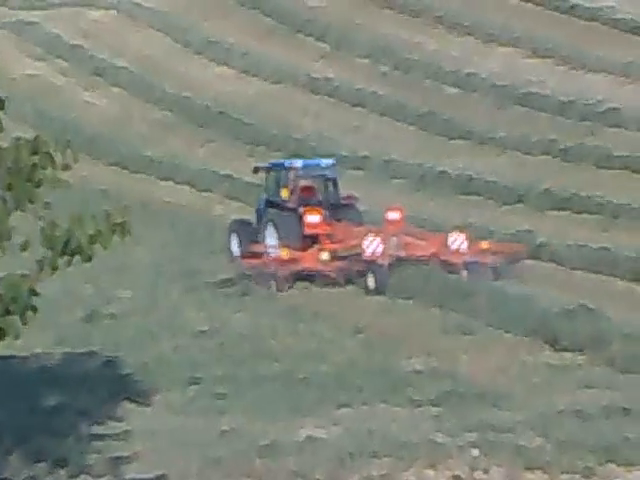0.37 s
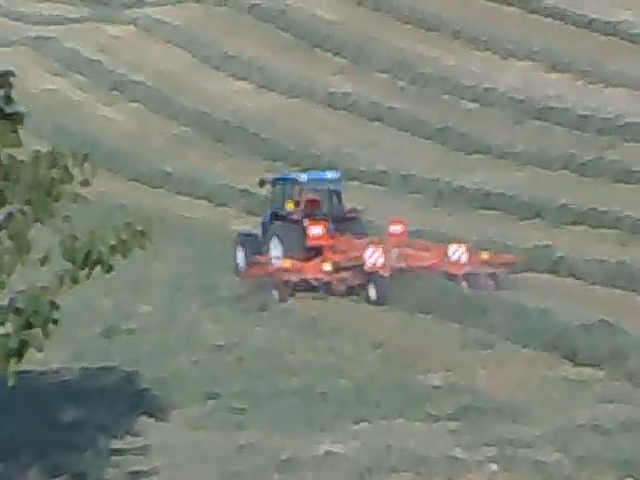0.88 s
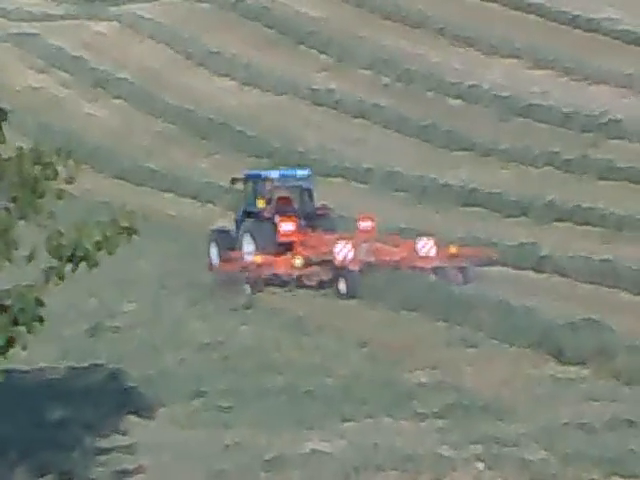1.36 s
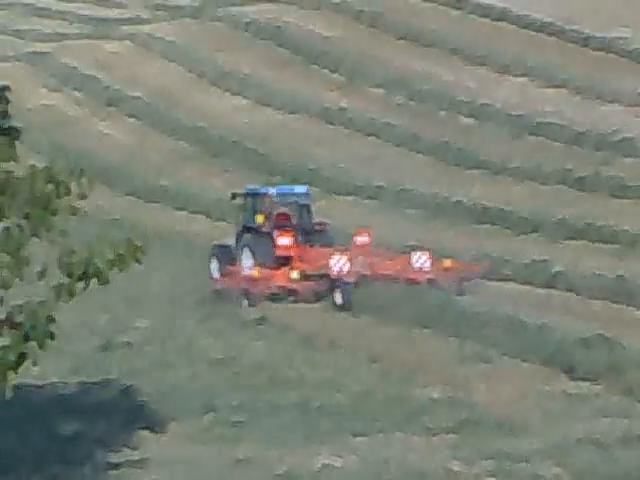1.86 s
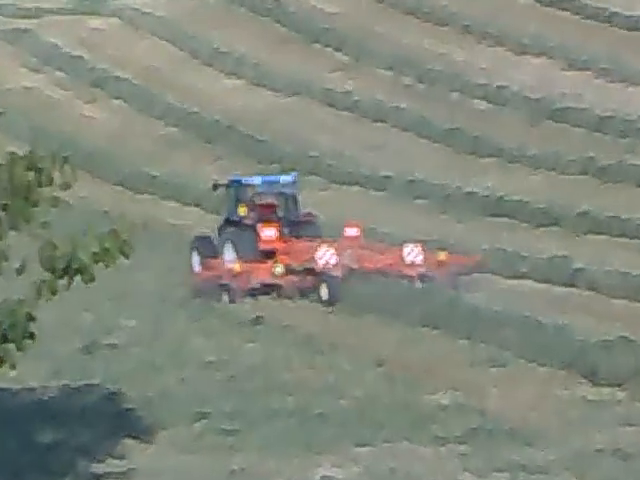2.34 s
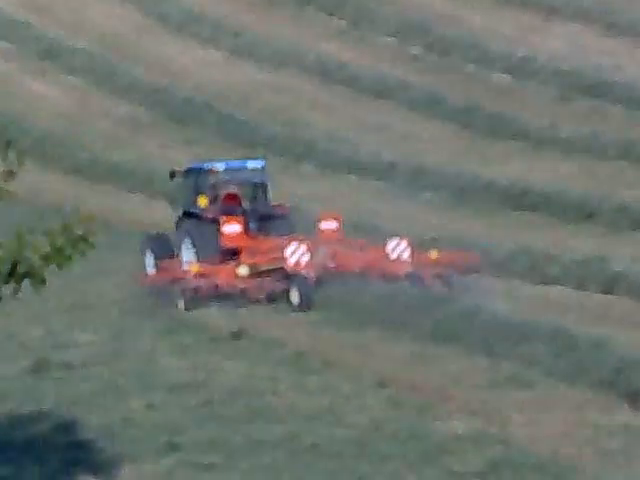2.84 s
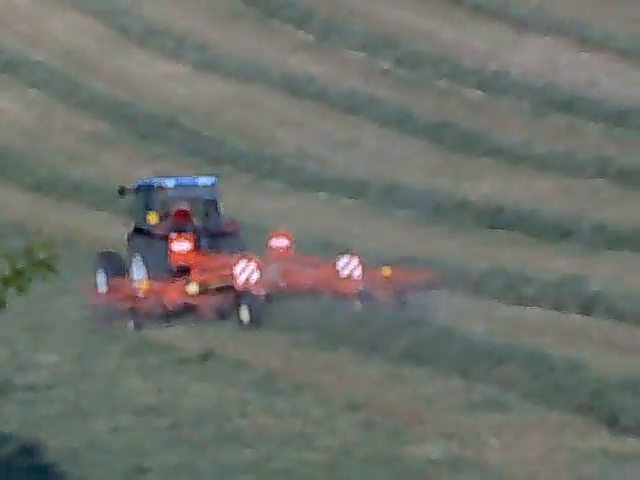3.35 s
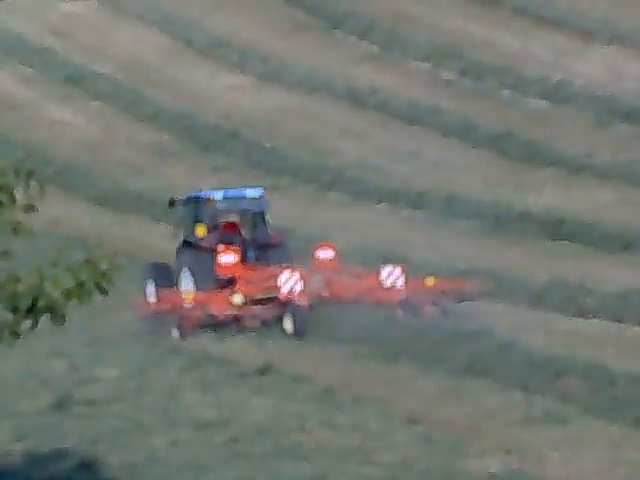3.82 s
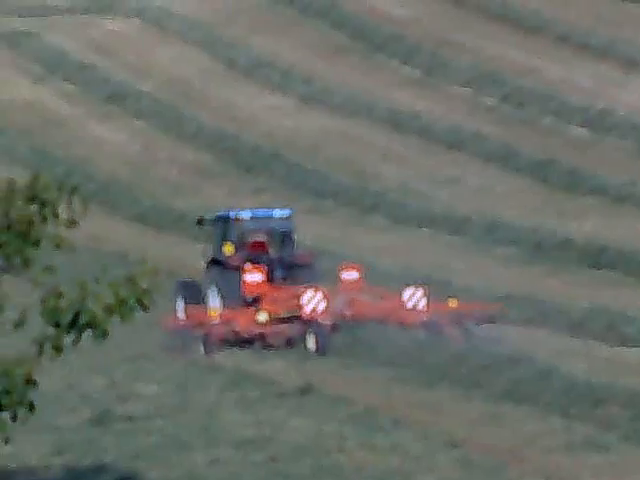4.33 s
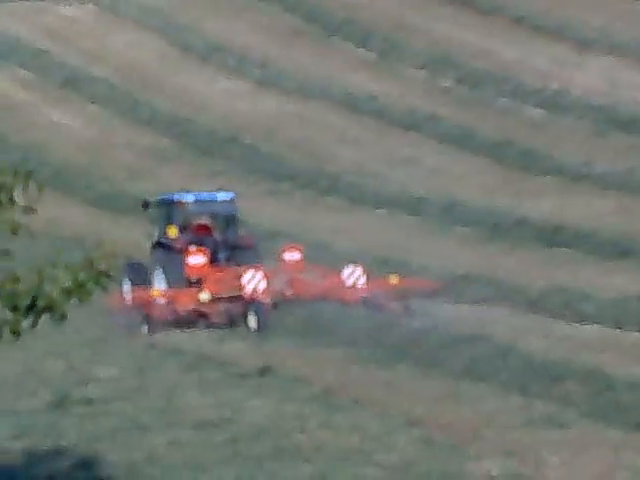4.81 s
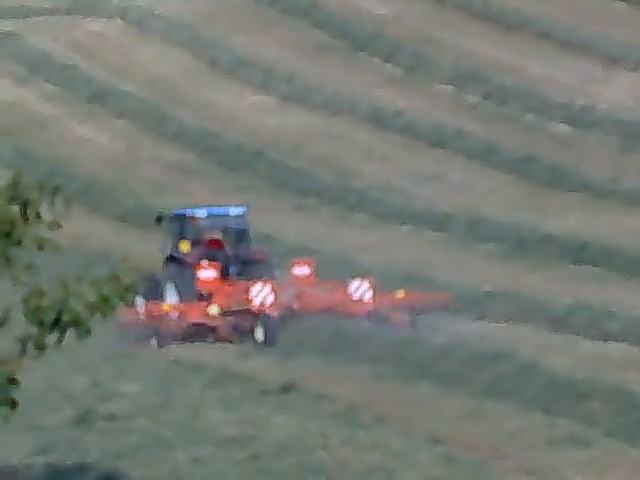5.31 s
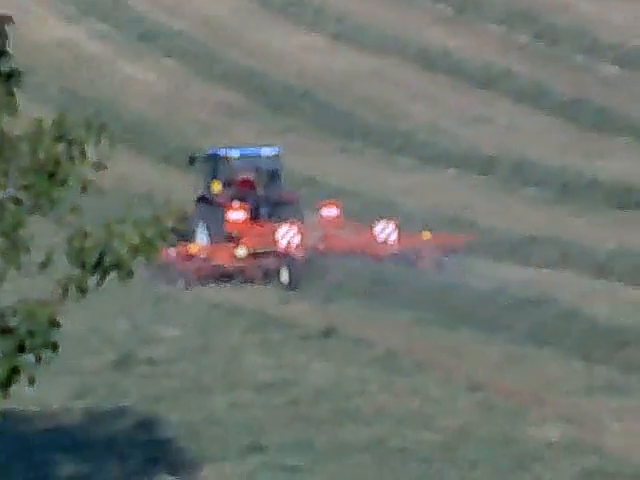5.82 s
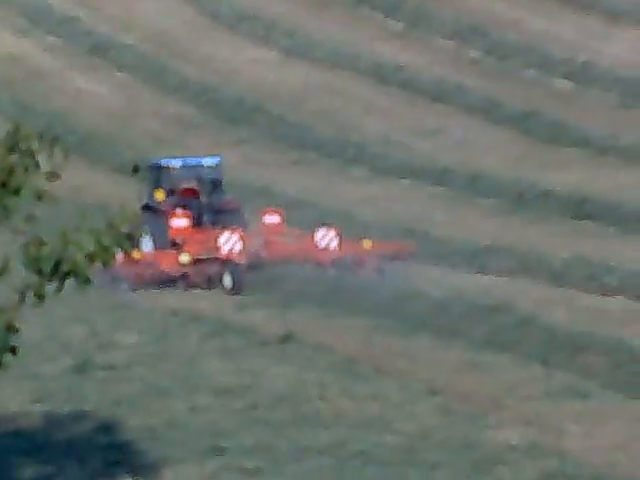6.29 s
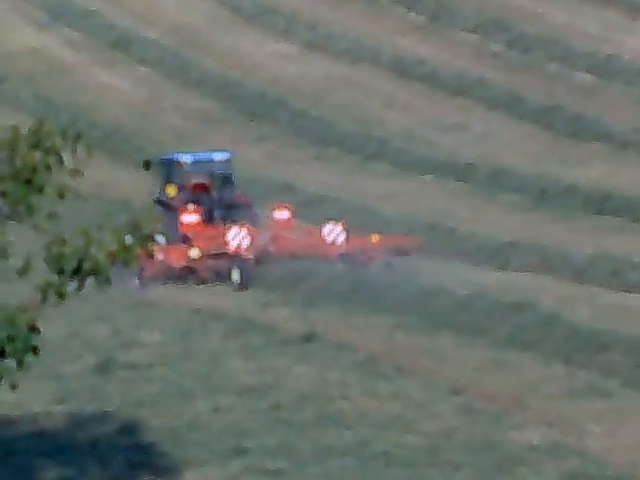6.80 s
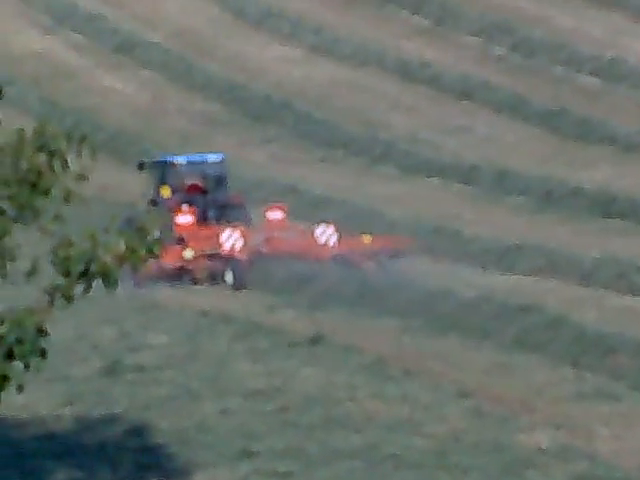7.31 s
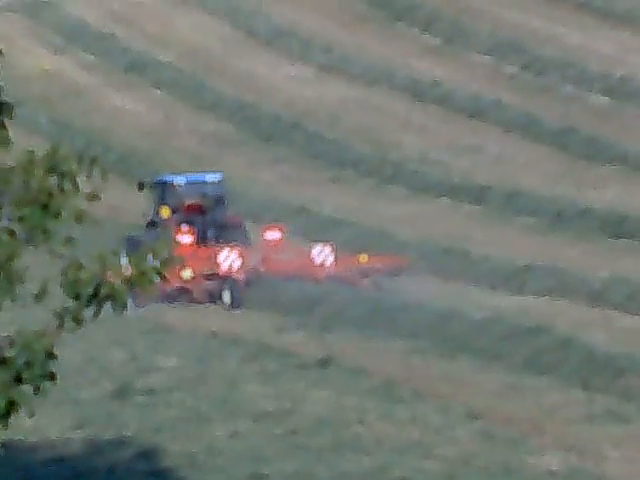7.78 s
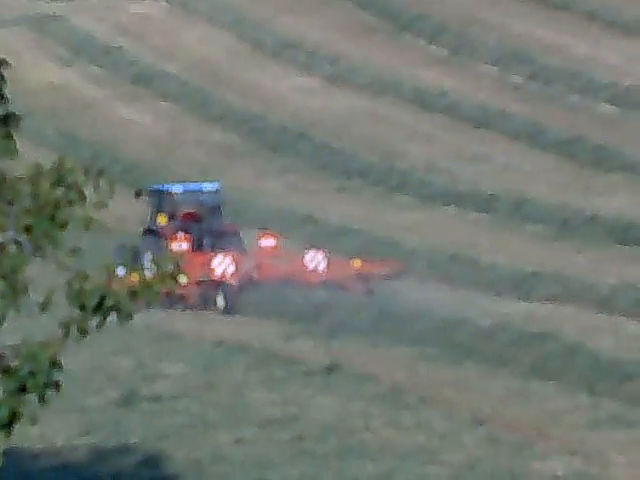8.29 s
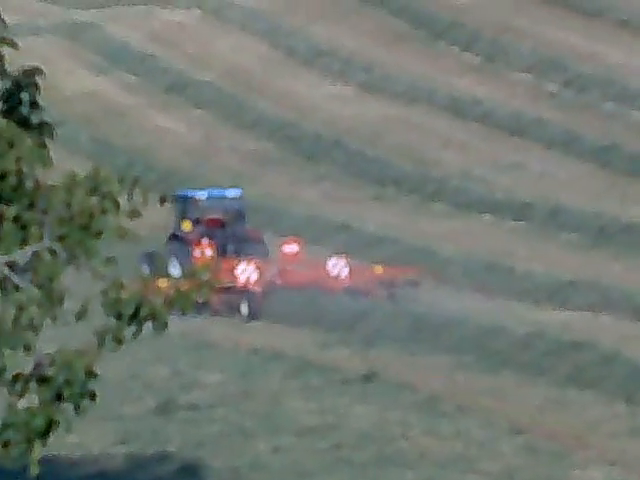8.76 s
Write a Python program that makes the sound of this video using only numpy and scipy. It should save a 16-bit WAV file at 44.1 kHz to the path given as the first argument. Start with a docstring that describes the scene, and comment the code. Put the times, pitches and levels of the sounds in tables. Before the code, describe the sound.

Fingers creak and tick on a plastic shell close by, with sharp loud knocks, while a distant tractor hums weakly behind soft hiss.

```python
"""Far tractor under handling noise

A tractor with a hay rake drones far across a field: wavering sine orders of its firing rate, in patchy air noise.
Near by, fingers handle a plastic shell: slips excite its modes as creaks, scrapes as ticks, blows as knocks.
Slides of a fingertip add band-shaped hiss. The drone, air and creak jump in level at five moments,
most of them hard knocks, and sink back; the slides, ticks and knocks keep their own levels."""
import sys
import numpy as np
from scipy import signal
from scipy.fft import rfft, irfft
from scipy.io import wavfile
from scipy.ndimage import uniform_filter1d

SR = 44100
rng = np.random.default_rng(int(sys.argv[2]) if len(sys.argv) > 2 else 0)


def persist_wave(psi):
    """Save psi, clipped to +-1, as 16-bit WAV."""
    counts = np.round(np.clip(psi, -1, 1) * 32767).astype(np.int16)
    wavfile.write(sys.argv[1], SR, np.atleast_2d(counts).T)


def volts(x):
    """Linear amplitude factor 10**(x/20) for a level x in dB, scalar or array-like."""
    e = np.asarray(x, float) / 20
    return 10 ** e


N = 392490  # length in samples


def read(points, hz):
    """Spectral interpolation: reads a spectrum on a logarithmic frequency axis."""
    f, value = np.transpose(points)
    return np.interp(np.log(hz + 1), np.log(f + 1), value)


def evened(x):
    """Normalization: scales a signal to rms 1."""
    return x / np.sqrt(np.mean(x ** 2) + 1e-20)


def smoothed(x, size, axis=-1):
    """Low-pass smoothing: two running means in succession."""
    return uniform_filter1d(uniform_filter1d(x, size, axis), size, axis)


def add(mix, s, sound):
    """Superposition: adds a sound to the mix from time s onward."""
    part = mix[round(s * SR):][:len(sound)]
    part += sound[:len(part)]


def line(rows, column):
    """Linear interpolation: one column of a curve, sample by sample."""
    times, values = np.array(rows)[:, 0], np.array(rows)[:, column]
    return np.interp(np.arange(N) / SR, times, values)


def after(times, sizes, fall_s):
    """Exponential relaxation: steps up by each size, then decays with time constant fall_s."""
    steps = np.zeros(N)
    np.add.at(steps, np.round(np.array(times) * SR).astype(int), sizes)
    return signal.lfilter([1], [1, -np.exp(-1 / (fall_s * SR))], steps)


# Slow level of the drone, air and creak: t/s, level/dB
STEADY_LEVEL = [(0.0, -73.5), (1.85, -73), (2.3, -73), (2.8, -81.5), (3.17, -81), (3.6, -85), (4.25, -92),
                (4.8, -84), (5.05, -80.5), (5.4, -76), (5.9, -74.5), (6.45, -78.5), (6.92, -80.5),
                (7.36, -79.5), (7.83, -77), (8.3, -76), (8.9, -75)]


def slow_level():
    """Slow amplitude modulation: the common level in dB, apart from the jumps."""
    return line(STEADY_LEVEL, column=1)


# Level jumps, most at hard knocks: t/s, jump of the steady sounds/dB, rise of the low creak modes/dB
LEVEL_JUMPS = [(2.303, 12.5, 22), (3.177, 14.5, 24.5), (5.062, 4, 5), (5.918, 11, 20), (6.93, 10, 20)]


def jumps(column, fall_s):
    """Exponential relaxation of one column of jumps, in dB."""
    rows = np.array(LEVEL_JUMPS)
    return after(rows[:, 0], rows[:, column], fall_s)


# Relative spectral density of field wash and microphone hiss: f/Hz, level per Hz/dB
AIR_SPECTRUM = [(12, -30.5), (25, -24.5), (60, -23.5), (140, -15), (210, -13.5), (300, -21.5), (450, -20.5),
                (1200, -23), (3000, -24.5), (8000, -28), (16000, -32)]


def air(patchy_db=2.5):
    """Filtered noise: Gaussian spectra are shaped, with faint drifting patches in time and frequency."""
    frames, hz = N // 512 + 5, np.fft.rfftfreq(2048, 1 / SR)
    real, imaginary, patches = rng.standard_normal((frames, 1025, 3)).T
    patches = uniform_filter1d(patches, 20, 0)  # across frequency
    patches = evened(uniform_filter1d(patches, 8, 1))  # across time
    level_db = read(AIR_SPECTRUM, hz)[:, None] + patchy_db * patches
    spectra = (real + 1j * imaginary) * volts(level_db)
    return evened(signal.istft(spectra, nperseg=2048, noverlap=1536)[1][:N])


# Firing rate of the engine: t/s, f/Hz
FIRING_RATE = [(0.0, 42.8), (0.891, 43.7), (2.18, 44.2), (3.301, 41.7), (4.1, 40.5), (5.5, 44),
               (6.47, 43.9), (6.938, 40.4), (7.242, 40.6), (7.832, 42.7), (8.9, 45)]
# Engine orders: multiple of the firing rate, relative level/dB
FIRING_ORDERS = [(1, 3.5), (2, 3), (2.5, -9.5), (3, 3.5), (3.5, -1.5), (4, -7), (5, 0)]


def engine(waver=0.2):
    """Additive synthesis: low firing orders as sines, each wavering as the sound crosses the field."""
    turns = np.cumsum(line(FIRING_RATE, column=1)) / SR
    points = rng.standard_normal((N // 441 + 2, len(FIRING_ORDERS), 2))  # one point per 10 ms
    drifts = evened(smoothed(points, 12, 0))
    at = np.arange(N) / 441
    drone = np.zeros(N)
    for k, (order, db) in enumerate(FIRING_ORDERS):
        swell, sway = [np.interp(at, np.arange(len(d)), d) for d in drifts[:, k].T]
        phase = 2 * np.pi * order * turns + 2 * waver * sway
        drone += volts(db) * (1 + waver * swell) * np.cos(phase)
    return evened(drone)


# Modes of the plastic shell: f/Hz, relative level/dB, undamped-by-hand 60 dB decay time/s
SHELL_MODES = [(230, -2.5, 0.0074), (500, -4, 0.0096), (800, -0.5, 0.0078), (1000, -2, 0.012),
               (1250, -7, 0.019), (1450, -11, .012), (1750, -2, 0.022), (1940, -2.5, 0.02),
               (2200, -2.5, 0.014), (2450, -11, 0.023), (3000, -7, 0.016), (3840, -11, 0.0078),
               (4780, -11.5, 0.013), (5083, -1.5, 0.0064), (5738, -6.5, 0.0088), (6420, -12, .008),
               (7217, -21, 0.016), (8500, -19, .004), (9500, -17, .005)]


def rings(damping=1, detune=1, struck=False):
    """Modal decay: one row per mode, at full stroke at once if struck, rising softly if rubbed."""
    t = np.arange(SR // 16) / SR
    hz, db, t60 = np.array(SHELL_MODES).T[:, :, None]
    dying = volts(db - 60 * damping * t / t60)
    omega = 2 * np.pi * hz * detune
    if struck:
        # the speed of a struck mode: it swings back to rest
        loss = np.log(1000) * damping / t60 / omega
        return dying * (np.cos(omega * t) - loss * np.sin(omega * t))
    opposed = np.pi * np.arange(len(SHELL_MODES))[:, None]  # neighbours swing in opposite phase
    return dying * np.sin(omega * t + opposed) * (1 - np.exp(-3 * hz * t))


# Grip on the shell: t/s, creak level over the slow level/dB, high-mode level/dB, low-mode level/dB
GRIP_ON_SHELL = [(0.0, 17, -6, -9), (0.3, 12.5, 1, -7), (0.7, 20, -2, -5.5), (1.0, 14.5, -2, -6),
                 (1.2, 15.5, -1, -2.5), (1.65, 17, -3.5, -7), (1.9, 13.5, 0.5, 6), (2.15, 16.5, -2.5, -3.5),
                 (2.3, 13.5, -2.5, -3.5), (2.45, 17, -4, -1), (2.8, 14, -3.5, -6.5), (3.0, 12, -7, -12.5),
                 (3.2, 12.5, 1, 3.5), (3.6, 16, -1.5, -14.5), (4.3, 16, -5, -8), (5.0, 9, -1, -4),
                 (5.4, 13, -3, -3), (5.9, 15.5, 3.5, -6), (6.2, 19.5, 1.5, -5.5), (6.5, 9.5, 0, -7),
                 (6.9, 20.5, 3.5, -5.5), (7.3, 10, 1, -2.5), (7.7, 16.5, 2, -6.5), (8.3, 8.5, 4.5, -8),
                 (8.75, 14, 5, -6), (8.9, 10.5, 6.5, -10)]


def creak(per_s=9000, clump_db=2.0, wander_db=1.2, colour_db=1.5):
    """Stick-slip friction: tiny slips of skin on plastic come in clumps, each ringing one shell mode."""
    clumps = evened(smoothed(rng.standard_normal(N), 500))
    size = volts(2.5 * np.minimum(rng.exponential(1, N), 5))
    size *= volts(clump_db * clumps) * (rng.random(N) < per_s / SR)
    mode, hz = rng.integers(0, len(SHELL_MODES), N), np.array(SHELL_MODES)[:, 0]
    parts = np.array([signal.oaconvolve(size * (mode == k), ring)[:N] for k, ring in enumerate(rings())])
    low = parts[hz < 1100].sum(0)
    body = parts[(hz > 1100) & (hz < 2700)].sum(0)
    high = parts[hz > 2700].sum(0)
    # pressure and colour drift at random
    press, dull, bright = [evened(w) for w in smoothed(rng.standard_normal((3, N)), 1500)]
    # heavier contact moves the low modes
    dull_db = line(GRIP_ON_SHELL, column=3) + jumps(column=2, fall_s=0.02) + colour_db * dull
    bright_db = line(GRIP_ON_SHELL, column=2) + colour_db * bright
    mix = body + volts(bright_db) * high + volts(dull_db) * low
    stir_db = after(np.array(SCRAPE_TICKS)[:, 0], 3.5, fall_s=0.05)  # each tick stirs up the creak
    press_db = line(GRIP_ON_SHELL, column=1) + stir_db + wander_db * press
    return volts(press_db) * mix / body.std()


# Finger slides: start t/s, end t/s, rms level before fading/dB, treble tilt/dB per octave
FINGER_SLIDES = [(5.907, 5.918, -24.5, 1.5), (6.123, 6.272, -39.5, 3.5), (6.931, 7.084, -48.5, -7.5)]
# Bands of the sliding hiss: centre f/Hz, half-width before widening/Hz, relative level before tilt/dB
HISS_BANDS = [(2600, 230, 3.5), (3120, 150, 1.5), (4650, 330, 1), (5560, 100, -7.5), (6300, 450, 6.5),
              (8050, 83, -3.5), (8950, 360, -2.5)]


def slides(grit_db=1.0):
    """Friction noise: a fingertip dragged over the shell gives gritty hiss in a few broad bands."""
    out = np.zeros(N)
    reference_hz = HISS_BANDS[0][0]
    for start, end, db, tilt_db in FINGER_SLIDES:
        n = round((end - start) * SR)
        noise, grit = rng.standard_normal((2, n))
        hz = np.fft.rfftfreq(n, 1 / SR)
        colour = np.zeros(len(hz))
        for centre_hz, width_hz, band_db in HISS_BANDS:
            peak = volts(band_db + tilt_db * np.log2(centre_hz / reference_hz))
            colour += peak / np.sqrt(1 + ((hz - centre_hz) / (width_hz + 250)) ** 4)
        gritty = noise * volts(grit_db * evened(uniform_filter1d(grit, 100)))
        hiss = irfft(rfft(gritty) * colour, n)
        add(out, start, volts(db) * evened(hiss) * signal.windows.tukey(n, 0.7))
    return out


# Ticks: t/s, peak level/dB, pitch of the touched spot f/Hz, low-mode level/dB, high-mode level/dB
SCRAPE_TICKS = [(0.093, -41.5, 1770, 10, 22), (0.263, -45, 1660, -23, -11), (0.435, -37.5, 1760, -36, -10),
                (0.604, -36.5, 1940, -42, -5), (0.724, -40, 1880, -26, 6), (0.743, -32, 1850, -36, -21),
                (1.043, -39.5, 1980, -32, -18), (1.064, -29, 2230, -44, -17),
                (1.174, -33.5, 1870, -38, -10), (1.207, -38.5, 1620, -20, -20),
                (1.377, -38, 1780, -13, -28), (1.538, -33.5, 1780, -43, -20), (1.779, -48, 1860, 18, -12),
                (1.825, -29, 1750, -10, -6.5), (1.995, -40, 1640, 12, -4), (2.038, -48, 1860, 3, -9),
                (2.142, -39, 1840, -26, -13), (2.16, -33.5, 1940, -18, 3), (2.179, -38.5, 1830, 11, 9),
                (2.205, -46.5, 1970, -8, -22), (2.309, -20.5, 1887, -9, -20), (2.586, -50, 2990, -20, -8),
                (2.626, -44, 2990, -10, -19.5), (2.732, -43, 1850, -37, -17), (2.776, -44.5, 1760, -30, -3),
                (3.075, -43.5, 1890, -25, -21), (3.088, -50, 1900, -20, 12), (3.14, -46, 1250, -5, -20.5),
                (3.391, -34, 1730, -38, -14), (3.809, -50.5, 2110, -30, -21.5), (3.904, -52, 2990, -26, -9),
                (4.033, -57, 1500, -13.5, -15), (4.488, -54.5, 1910, -23.5, 1.5),
                (4.641, -51.5, 1840, -29.5, -18), (5.06, -38, 1810, -25, -10),
                (5.079, -48.5, 1820, 13, 0.5), (5.351, -43.5, 1830, -27, -9), (5.528, -43, 1960, -19, -22),
                (5.558, -41, 1750, -27.5, -7.5), (5.747, -41, 1904, -39, -27.5),
                (5.833, -38, 1760, -38, -8), (5.96, -33.5, 1730, -12, -13.5), (5.993, -27, 3060, -24, -21),
                (6.009, -27.5, 1960, -31, 10.5), (6.179, -27, 2780, -16, 0), (6.418, -43, 1880, -29, 2),
                (6.586, -44, 1780, -28, 4.5), (6.876, -41.5, 2260, -31, -2.5),
                (7.094, -36.5, 2980, -44, -17), (7.393, -37.5, 2095, -34, 19), (7.415, -39, 2215, -36, 4),
                (7.672, -37.5, 2970, -39, -5.5), (7.986, -43, 2170, -26.5, -20),
                (8.208, -41, 2275, -14, -7.5), (8.509, -41.5, 1800, -32, -4),
                (8.697, -37, 2600, -43.5, -17), (8.803, -35.5, 1810, -29, 14),
                (8.855, -42.5, 2200, -24.5, -4.5)]


def ticks(reach=0.25, spread=0.7, damping=0.95, scrape_t60_s=0.029):
    """Modal excitation by noise: a short scrape rings modes near the spot, with some low and high ones."""
    out, hz = np.zeros(N), np.array(SHELL_MODES)[:, 0]
    t = np.arange(SR // 12) / SR
    for s, db, spot_hz, low_db, top_db in SCRAPE_TICKS:
        near = np.exp(-(np.log(hz / spot_hz) / reach) ** 2)
        near_double = np.exp(-(np.log(hz / (2 * spot_hz)) / reach) ** 2)
        high = volts(top_db) * (near_double + spread)  # the spot's overtone leads the high modes
        weight = np.where(hz < 1100, volts(low_db), np.where(hz > 3500, high, near))
        scrape = rng.standard_normal(len(t)) * volts(-60 * t / scrape_t60_s)
        detune = 1 + 0.03 * rng.standard_normal((len(hz), 1))
        sound = signal.fftconvolve(scrape, weight @ rings(damping, detune))
        add(out, s, volts(db) * sound / abs(sound).max())
    return out


# Knocks, their rebounds and dry snaps: t/s, blow level/dB, pitch of the spot f/Hz,
# damping by the hand (factor on the decay rate), low-mode level/dB, high-mode level/dB
SHELL_BLOWS = [(1.889, -44.5, 600, 0.85, 9, -30), (2.053, -53, 2000, 2.2, -20, 12),
               (2.3007, 5, 1400, 1.2, -32, -16), (2.3021, 1, 800, 1.0, -32, -30),
               (3.1752, -3, 1300, 1.96, 6, -15.5), (3.1769, 2, 800, 0.55, -15, -27.5),
               (5.881, -39, 1290, 3, -10, 8), (5.9166, -1.5, 1550, 1.33, -2, -6.5),
               (5.9188, -3, 1000, 1.2, -10, -12), (6.118, -28, 1280, 1.5, -31, 6),
               (6.9307, -20, 2450, 1.7, -40, 16), (6.9316, -28, 3000, 1.7, -36.5, 15.5),
               (7.216, -26.5, 2450, 1.4, -15.5, -15), (7.2165, -31.5, 780, 1.1, -20, -30),
               (7.365, -41, 1413, 1.5, -17.5, -8)]


def knocks(contact_s=0.00008, reach=0.18, bass_share=0.45):
    """Impulse response: a short inward blow rings modes near the spot; the gripping hand damps them."""
    out, hz = np.zeros(N), np.array(SHELL_MODES)[:, 0]
    blow = np.exp(-(np.arange(-12, 13) / SR / contact_s) ** 2 * 4)
    blow /= blow.sum()
    for s, db, spot_hz, damping, low_db, top_db in SHELL_BLOWS:
        swing = rings(damping, struck=True)
        near = np.exp(-(np.log(hz / spot_hz) / reach) ** 2)
        upper = (near + volts(top_db) * (hz > 3300)) @ swing
        # a small spot sounds no bass
        no_bass = signal.butter(2, bass_share * spot_hz, "high", fs=SR, output="sos")
        upper = signal.sosfilt(no_bass, upper)
        low = volts(low_db) * (hz < 600) @ swing
        add(out, s, -volts(db) * np.convolve(upper + low, blow))  # minus: inward
    return out


def scene():
    """Superposition: tractor, air and creak ride one jumping level; single handling sounds lie on top."""
    slow_db, jumps_db = slow_level(), jumps(column=1, fall_s=0.25)
    far = volts(slow_db + jumps_db) * (volts(11.5) * air() + volts(4.5) * engine())
    rubbing = volts(slow_db + 1.3 * jumps_db) * creak()  # the creak takes a larger share of each jump
    return (far + rubbing + ticks() + knocks() + slides())[None]


def band_limit(x):
    """A steep low-pass at the top of the band."""
    return signal.sosfilt(signal.butter(12, 16970, fs=SR, output="sos"), x)


def record(dry):
    """High-pass filtering and hard limiting: deep bass drops, peaks clip, the input sits off zero."""
    thin = signal.sosfilt(signal.butter(2, 20, "high", fs=SR, output="sos"), dry)
    ceiling = 0.71  # of full scale
    finished = np.clip(thin, -ceiling, ceiling) - 0.0006
    return band_limit(finished)


dry = scene()
out = record(dry)
persist_wave(out)
```